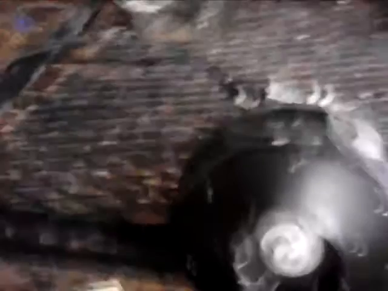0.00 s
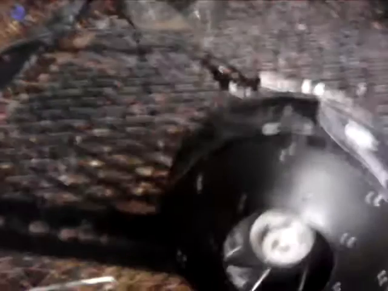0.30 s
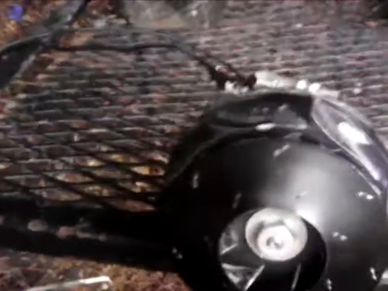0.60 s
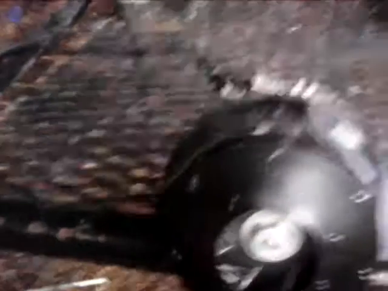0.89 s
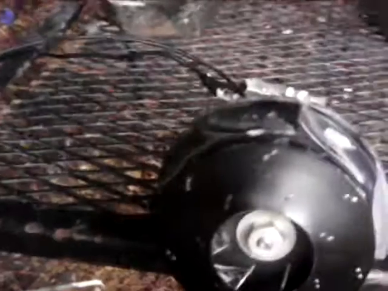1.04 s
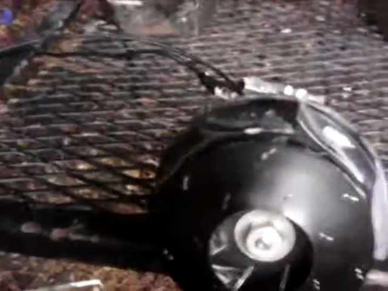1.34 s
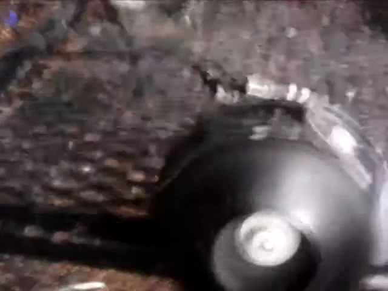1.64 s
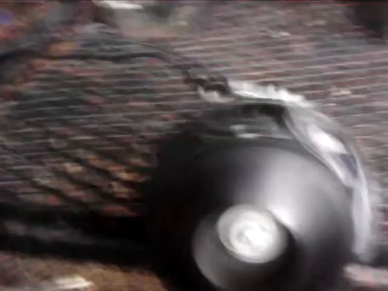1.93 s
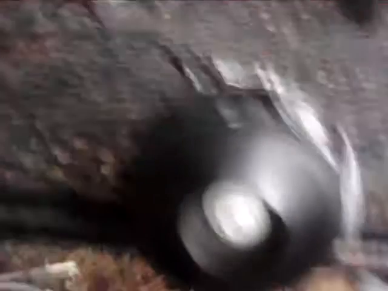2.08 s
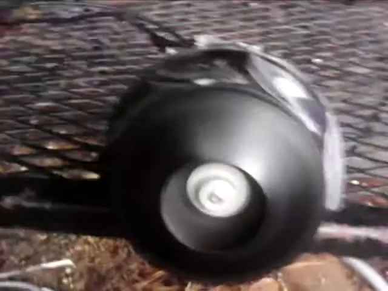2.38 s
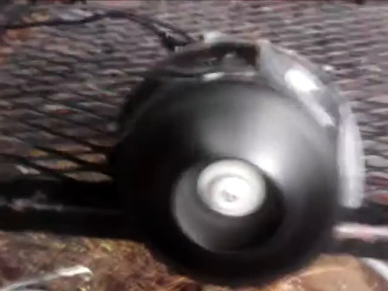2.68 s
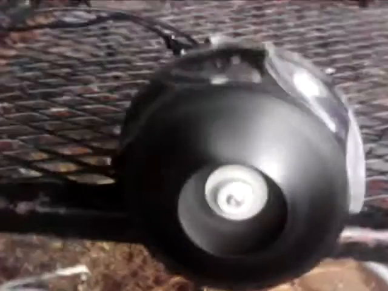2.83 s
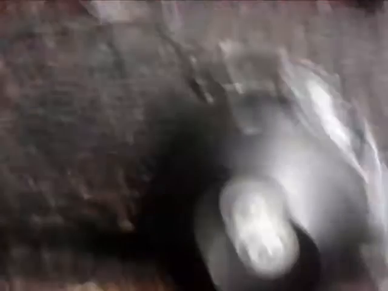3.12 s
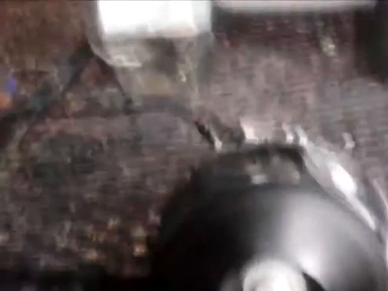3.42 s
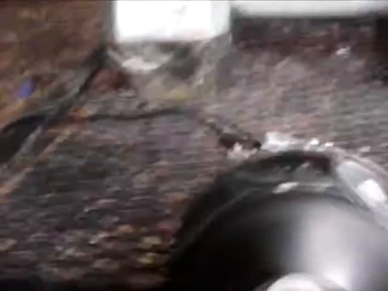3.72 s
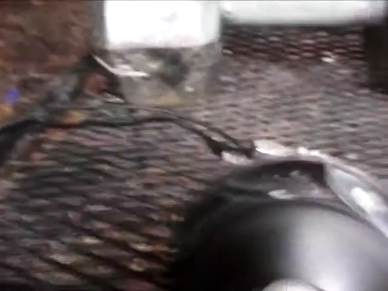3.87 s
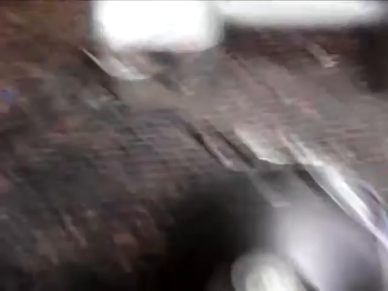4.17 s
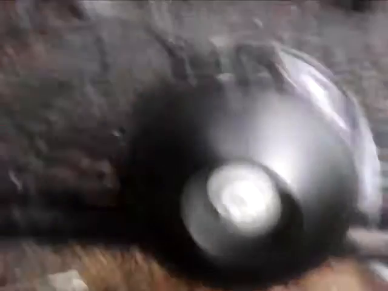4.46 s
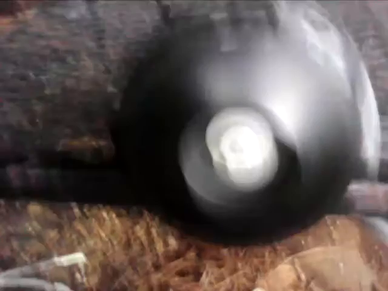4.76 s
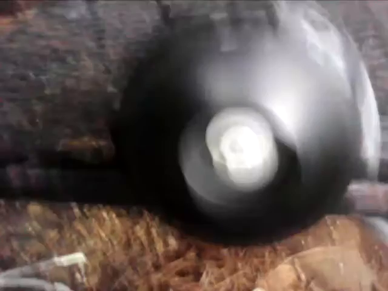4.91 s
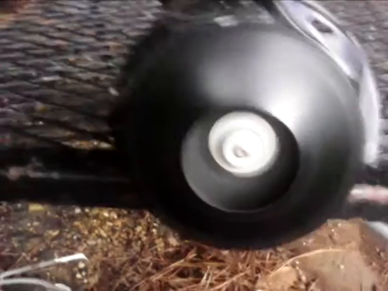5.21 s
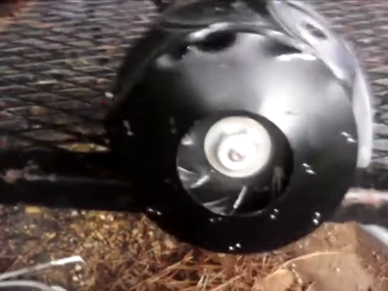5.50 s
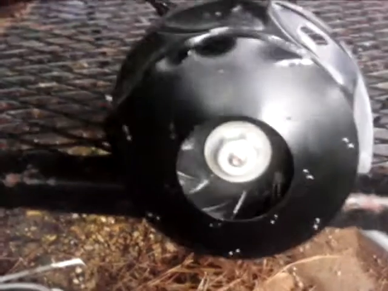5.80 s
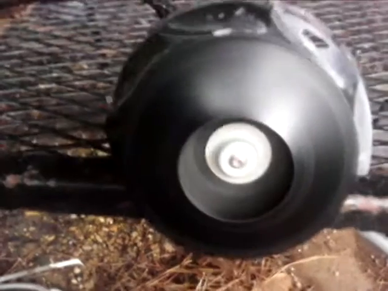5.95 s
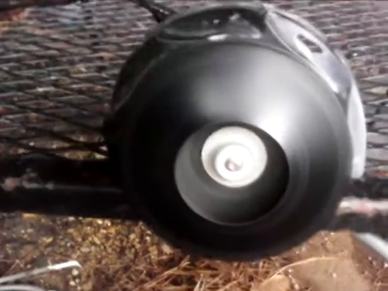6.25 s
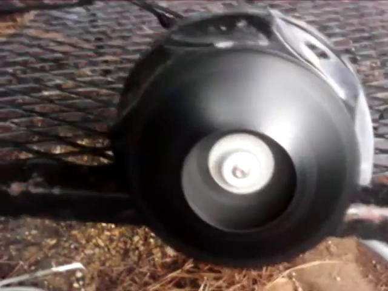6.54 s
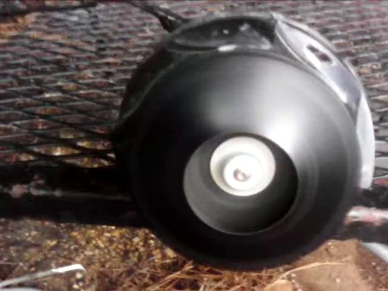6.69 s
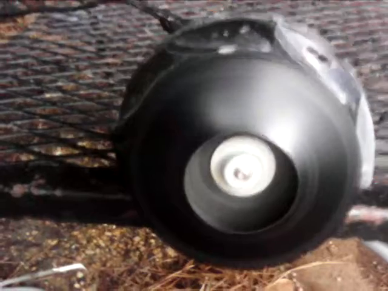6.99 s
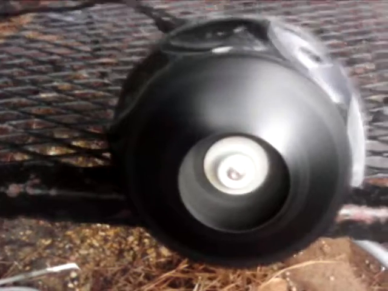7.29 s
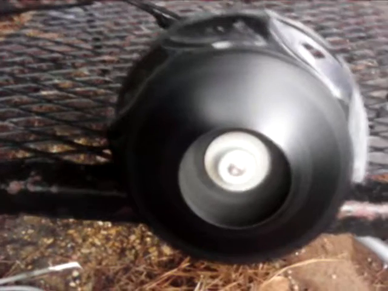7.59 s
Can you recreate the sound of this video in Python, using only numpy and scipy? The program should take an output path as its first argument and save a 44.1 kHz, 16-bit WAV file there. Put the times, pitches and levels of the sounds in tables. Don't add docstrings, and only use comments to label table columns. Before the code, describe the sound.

Quiet room hush and tiny taps on the microphone case give way to an exposed fan motor. Two short power bursts make it whine and hiss, followed by a falling glide. Another harder start rings its shell, then brush friction fizzes as it slows. A hand shifts faintly; four longer spin-ups follow in quick succession, loud and bright to the end. Very close handheld mono sound, little room echo.

```python
import sys
import numpy as np
from scipy import signal
from scipy.fft import rfft, irfft, next_fast_len
from scipy.io import wavfile
from scipy.ndimage import uniform_filter1d

SR = 44100
rng = np.random.default_rng(int(sys.argv[2]) if len(sys.argv) > 2 else 0)


def gain_from_db(level_db):
    decades = np.asarray(level_db, float) / 20
    return 10 ** decades


def store_wav(level_fs):
    pcm = np.round(np.clip(np.atleast_2d(level_fs), -1, 1) * 32767)
    wavfile.write(sys.argv[1], SR, pcm.T.astype(np.int16))


N = 336042
TIME_S = np.arange(N) / SR


def rms_one(x):
    return x / np.sqrt(np.mean(x ** 2) + 1e-20)


def drift(rate_hz):
    r = np.exp(-80 * np.pi * rate_hz / SR)
    slow = signal.lfilter([1], [1, -2 * r, r * r], rng.standard_normal(N // 40 + 2002))[2000:]
    return np.interp(np.arange(N) / 40, np.arange(len(slow)), rms_one(slow))


def coloured(points, modes=()):
    size = next_fast_len(N)
    hz = np.arange(size // 2 + 1) * SR / size + 1e-3
    points_hz, points_db = np.transpose(points)
    level_db = np.interp(np.log(hz), np.log(points_hz), points_db)
    for mode_hz, width_hz, mode_db in modes:
        level_db = level_db + mode_db / (1 + (2 * (hz - mode_hz) / width_hz) ** 2)
    gain = gain_from_db(level_db) * (hz > 10)
    counted = (hz > 2500) & (hz < 12000) if modes else hz > 0
    gain /= np.sqrt(np.mean(gain ** 2 * counted))
    return irfft(gain * rfft(rng.standard_normal(size)), size)[:N]


def resonance(x, hz, width_hz):
    r = np.exp(-np.pi * width_hz / SR)
    b = np.array([1, 0, -1]) * (1 - r * r) / 2
    return signal.lfilter(b, [1, -2 * r * np.cos(2 * np.pi * hz / SR), r * r], x + 1e-18)


def speed_up(speed_hz, smooth):
    return uniform_filter1d(np.gradient(speed_hz) * SR, size=smooth)


# (closes [s], opens [s])
SWITCH_S = [
    (1.018, 1.118),
    (1.368, 1.46),
    (3.054, 3.196),
    (5.302, 6.015),
    (6.213, 6.46),
    (6.772, 7.003),
    (7.267, 8.0),
]
STALL_HZ_PER_S, PULL_HZ_PER_S, PULL_KNEE_HZ = 2800, 29800, 99.8
FRICTION_HZ_PER_S, CREEP_HZ, FAN_DRAG_PER_HZ = 151.1, 40, .00243


def rotor():
    t = np.arange(N * 1000 // SR + 2) / 1000
    live = 0
    for on_s, off_s in SWITCH_S:
        live = live + np.clip(1000 * (t - on_s), 0, 1) - np.clip(1000 * (t - off_s), 0, 1)
    speed = [1.]
    for current in live[1:]:
        hz = speed[-1]
        pull = current * min(STALL_HZ_PER_S, PULL_HZ_PER_S / (1 + hz / PULL_KNEE_HZ) ** 2)
        brake = FRICTION_HZ_PER_S * np.tanh(hz / CREEP_HZ) + FAN_DRAG_PER_HZ * hz * hz
        speed.append(hz + (pull - brake) / 1000)
    return np.interp(TIME_S, t, speed), np.interp(TIME_S, t, live)


# (multiple of shaft speed, level [dB])
OVERTONES = [(1, 0), (2, -5), (3, -6.5), (5, -16)]
# (frequency [Hz], level over the hiss [dB])
BODY = [(60, -9), (120, -10), (170, -16), (215, -9.5), (260, -9), (330, -7.5), (400, -8.5), (500, -9),
        (680, -6.5), (800, -6.5), (1000, -12.5), (1500, -12)]
RATTLE_DB_PER_OCTAVE, RATTLE_HZ = 10, 360


def unbalance(angle, speed_hz, air_db):
    weak_db = RATTLE_DB_PER_OCTAVE * np.minimum(np.log2(speed_hz / RATTLE_HZ), 0)
    shaft = 0
    for k, level_db in OVERTONES:
        tone_db = level_db + np.interp(k * speed_hz, *np.transpose(BODY)) + (k > 1) * weak_db
        level = gain_from_db(tone_db + 1.5 * np.sqrt(k) * drift(8))
        shaft = shaft + level * np.sin(k * angle + rng.uniform(0, 6))
    return np.sqrt(2) * gain_from_db(air_db) * shaft


BLADES, BLADE_DB, BLADE_SIDE_DB = 7, -10.5, -5
INLET_HZ, INLET_WIDTH_HZ = 2000, 650


def blade_passing(angle, air_db):
    tone = gain_from_db(2.5 * drift(7)) * np.sin(BLADES * angle + .3 * drift(25))
    tone += gain_from_db(BLADE_SIDE_DB + 3 * drift(7)) * np.sin((BLADES + 1) * angle + .3 * drift(25))
    for _ in range(2):
        tone = resonance(tone, INLET_HZ, INLET_WIDTH_HZ)
    return np.sqrt(2) * gain_from_db(air_db + BLADE_DB) * tone


# (frequency [Hz], level over the hiss [dB])
SLOT_COLOUR = [(1400, -25), (1600, -12), (2200, -13), (2700, -12), (3300, -12.5), (3700, -19), (4600, -18),
               (6500, -15.5)]
# (frequency [Hz], width [Hz], level [dB])
LOAD_MODES = [(3200, 300, -2.5), (4180, 240, -1)]
SLOTS, SLOT_LOAD_DB, MAINS_HZ, HUM_DB = 13, -3, 120, -28


def slots(angle, speed_hz, air_db):
    mains = np.sin(2 * np.pi * MAINS_HZ * TIME_S)
    load = np.sqrt(np.clip(speed_up(speed_hz, 441) / 3000, 0, 1))
    pull = np.sin(SLOTS * angle + .3 * drift(30) + 2.2 * load * drift(110))
    colour_db = np.interp(SLOTS * speed_hz, *np.transpose(SLOT_COLOUR))
    line = pull * gain_from_db(colour_db + SLOT_LOAD_DB * load + 1.2 * drift(12)) * (1 + .8 * load * mains)
    for mode_hz, width_hz, mode_db in LOAD_MODES:
        line += gain_from_db(mode_db) * resonance(pull * load, mode_hz, width_hz)
    return np.sqrt(2) * gain_from_db(air_db) * (line + gain_from_db(HUM_DB) * load * mains)


# (shell rings [s], ring over the hiss [dB], jolt strikes [s], jolt [dB])
STARTS = [
    (1.071, 26.5, 1.036, -59),
    (3.109, 31.5, 3.084, -46),
    (5.359, 27, 5.32, -57),
]
SHELL_HZ, SHELL_WIDTH_HZ = 1990, 24


def shell_ring(angle, speed_hz, air_db):
    torque = np.clip(speed_up(speed_hz, 441) / 3000, 0, 1)
    rings_s, rings_db, *_ = np.transpose(STARTS)
    kick = gain_from_db(air_db + np.interp(TIME_S, rings_s, rings_db)) * torque * np.sin(SLOTS * angle)
    for _, _, switch_s, jolt_db in STARTS:
        kick[round(switch_s * SR)] += gain_from_db(jolt_db) * SR / (2 * np.pi * SHELL_WIDTH_HZ)
    return np.sqrt(2) * resonance(kick, SHELL_HZ, SHELL_WIDTH_HZ)


GATE_SHUT_HZ, GATE_OPEN_HZ, GATE_DB, GATE_LAG_S = 47.6, 81.5, -19.5, 0.011


def gate(speed_hz):
    late_hz = np.interp(np.arange(N) - GATE_LAG_S * SR, np.arange(N), speed_hz)
    return np.clip(np.log(late_hz / GATE_SHUT_HZ) / np.log(GATE_OPEN_HZ / GATE_SHUT_HZ), 0, 1)


AIR_DB_AT_200_HZ, AIR_DB_PER_OCTAVE, CEILING_DB, LOAD_DB = -22, 17, -14, 2
REOPEN_S, REOPEN_WIDTH_S, REOPEN_DB = 4.54, .07, 9


def air_level(speed_hz):
    load = np.clip(speed_up(speed_hz, 881) / STALL_HZ_PER_S, 0, 1)
    free_db = AIR_DB_AT_200_HZ + AIR_DB_PER_OCTAVE * np.log2(speed_hz / 200)
    free = gain_from_db(free_db + LOAD_DB * load + GATE_DB * (1 - gate(speed_hz)))
    limited = free / (1 + (free / gain_from_db(CEILING_DB)) ** 6.0) ** (1 / 6)
    return 20 * np.log10(limited) + REOPEN_DB * np.exp(-((TIME_S - REOPEN_S) / REOPEN_WIDTH_S) ** 2)


# (frequency [Hz], density [dB per Hz])
FAST_AIR = [(60, -30), (150, -27.5), (300, -20), (550, -18), (800, -15), (1400, -16), (2000, -18),
            (3600, -14.5), (5700, -14), (8500, -15.5), (11400, -17), (12500, -23), (14000, -22.5)]
SLOW_AIR = [(60, -12), (120, -5.5), (270, -12), (550, -8.5), (900, -5.5), (1400, -10.5), (2400, -19.5),
            (3600, -11.5), (5700, -10), (7600, -17), (11400, -26.5), (14000, -53)]
SLOW_HZ, FAST_HZ = 107.05, 314
# (frequency [Hz], width [Hz], level [dB])
HOUSING = [(1693, 65, 4), (2566, 1130, 8), (4487, 940, 4), (7130, 1000, 6.5), (10240, 400, -2.5),
           (13590, 700, 13.5)]
# (frequency [Hz], width [Hz], level [dB])
NOTCHES = [(3150, 300, -8), (12850, 650, -11)]
# (frequency [Hz], width [Hz], level [dB])
TURNED = [(2240, 260, 5), (5070, 400, -5.5), (6340, 1500, 2), (10040, 760, -3)]
TURNED_FROM_S, TURNED_TO_S = 3.07, 4.9


def air(speed_hz, air_db):
    bright = np.clip(np.log(speed_hz / SLOW_HZ) / np.log(FAST_HZ / SLOW_HZ), 0, 1)

    def hiss(modes):
        return np.sqrt(bright) * coloured(FAST_AIR, modes) + np.sqrt(1 - bright) * coloured(SLOW_AIR, modes)

    heard = hiss(HOUSING + NOTCHES)
    aside = slice(round(TURNED_FROM_S * SR), round(TURNED_TO_S * SR))
    heard[aside] = hiss(HOUSING + NOTCHES + TURNED)[aside]
    return gain_from_db(air_db + 0.1 * drift(11) + 0.9 * drift(67)) * heard


DRAG_DB, DRAG_DB_PER_OCTAVE, DRAG_HZ = -54, 8, 163
GRID_HZ, GRID_DB, FACING_DB = 5130, 21.5, 5


def brushes(speed_hz, live):
    facing = TIME_S > TURNED_FROM_S
    octaves = np.log2(speed_hz / 100)
    grid = facing * gain_from_db(GRID_DB + 7.8 * octaves) * resonance(rng.standard_normal(N), GRID_HZ, 200)
    friction = rms_one(resonance(rng.standard_normal(N), .98 * SHELL_HZ, 53))
    coasting = np.clip(5.4 * (1 - speed_hz / DRAG_HZ), 0, 1) * uniform_filter1d(1 - live, size=441)
    level_db = DRAG_DB + DRAG_DB_PER_OCTAVE * octaves + 0.55 * GATE_DB * (1 - gate(speed_hz))
    return coasting * gain_from_db(level_db + FACING_DB * facing + 1.5 * drift(22)) * (friction + grid)


# (time [s], length [s], level [dB], release [dB per s])
BLOWS = [(1.035, 0.93, -38, 161), (1.93, 0.2, -31.5, 60), (2.2, 0.4, -40.5, 230), (3.06, 0.98, -42, 146),
         (3.793, 0.45, -31.5, 101), (4.47, .05, -46, 28), (5.3, .25, -40, 60), (5.55, 1.1, -45, 150),
         (6.65, 0.65, -36, 100), (7.3, 0.19, -42, 90)]
# (frequency [Hz], density [dB per Hz])
GUST_COLOUR = [(12, -25), (22, 2), (36, 1), (70, -2.5), (130, -9), (300, -57.5)]
BLOW_ATTACK_S, STILL_DB, LUMP_DB = .05, -61.5, 2.0


def gusts():
    level = gain_from_db(STILL_DB)
    for start_s, length_s, level_db, release_db_per_s in BLOWS:
        swell = np.clip((TIME_S - start_s) / BLOW_ATTACK_S, 0, 1) ** 2
        release_db = release_db_per_s * np.maximum(TIME_S - start_s - length_s, 0)
        level = np.maximum(level, swell * gain_from_db(level_db - release_db))
    return level * gain_from_db(-6.0 + LUMP_DB * drift(3.6) + 2.8 * drift(22)) * coloured(GUST_COLOUR)


# (time [s], peak [dB], rub length [s])
TAPS = [(0.03, -67, 0.018), (0.172, -53, 0.0087), (0.408, -64, 0.016), (0.529, -73, 0.016),
        (0.581, -67, 0.016), (0.708, -60, 0.021), (0.732, -59, 0.016), (0.834, -62, 0.019),
        (0.854, -62, 0.016)]
# (frequency [Hz], level [dB], t60 [s])
CASE = [(870, 8, 0.028), (1050, -1, 0.056), (1850, -14, .03)]


def taps():
    rubs, grit = np.zeros(N), rng.standard_normal(N)
    for time_s, peak_db, length_s in TAPS:
        size = max(round(length_s * SR), 40)
        start = round(time_s * SR) - size // 4
        rubs[start:][:size] += gain_from_db(peak_db + 5.5) * np.hanning(size) / np.sqrt(size)
    out = np.zeros(N)
    for hz, level_db, t60_s in CASE:
        r, w = gain_from_db(-60 / (t60_s * SR)), 2 * np.pi * hz / SR
        rub = resonance(rubs * grit, hz, 500)
        out += gain_from_db(level_db) * signal.lfilter([0, np.sin(w)], [1, -2 * r * np.cos(w), r * r], rub)
    return out


# (time [s], swell [s], level [dB])
HANDS = [
    (.6, .4, -66.5),
    (4.47, .03, -65.5),
]
# (frequency [Hz], density [dB per Hz])
MURMUR_COLOUR = [(60, -18.5), (110, 4), (220, -6.5), (520, -11.5), (900, -19.5), (1300, -19), (1600, -30),
                 (2600, -38.5)]
# (frequency [Hz], density [dB per Hz])
ELECTRONICS_COLOUR = [(500, -28), (1000, 1), (1500, 0), (3400, -12), (8000, -16), (13000, -7.5),
                      (14000, -8)]
ELECTRONICS_DB, MURMUR_DB, WAKE_DB, SETTLE_DB_PER_S = -79.5, -70.5, -43, 48
WARM_UP_S, WARM_UP_DB = .3, -3


def floor(speed_hz, live):
    wake = gain_from_db(WAKE_DB + 1.8 * GATE_DB * (1 - gate(speed_hz))) * np.clip(speed_hz / GATE_SHUT_HZ, 0, 1) ** 2.0
    wake *= np.clip(2 - speed_hz / 110, 0, 1) * uniform_filter1d(1 - live, size=441)
    hand = 0
    for start_s, swell_s, level_db in HANDS:
        settle_db = SETTLE_DB_PER_S * np.maximum(TIME_S - start_s - swell_s, 0)
        hand = hand + np.clip((TIME_S - start_s) / swell_s, 0, 1) * gain_from_db(level_db - settle_db)
    room = gain_from_db(MURMUR_DB + WARM_UP_DB * np.clip(1 - TIME_S / WARM_UP_S, 0, 1))
    murmur = (room + wake + hand) * gain_from_db(2.0 * drift(8)) * coloured(MURMUR_COLOUR)
    return murmur + gain_from_db(ELECTRONICS_DB) * coloured(ELECTRONICS_COLOUR)


DUCK_S, DUCK_WIDTH_S, DUCK_DB = 4.445, 0.013, -8


def scene():
    speed_hz, live = rotor()
    angle = 2 * np.pi * np.cumsum(speed_hz) / SR
    air_db = air_level(speed_hz)
    mono = unbalance(angle, speed_hz, air_db) + blade_passing(angle, air_db)
    mono += slots(angle, speed_hz, air_db) + shell_ring(angle, speed_hz, air_db)
    mono += air(speed_hz, air_db) + brushes(speed_hz, live)
    mono += gusts() + taps() + floor(speed_hz, live)
    mono *= gain_from_db(DUCK_DB * np.exp(-((TIME_S - DUCK_S) / DUCK_WIDTH_S) ** 2))
    return np.stack([mono, mono])


# (frequency [Hz], width [Hz], threshold of the drift [spreads])
DROPPED_BANDS = [(3110, 190, .5), (3290, 150, .9), (10000, 260, 1.4), (12250, 300, .9), (12600, 400, .2),
                 (12950, 380, -.2)]


def drop_bands(x):
    size = next_fast_len(N)
    hz, spectrum = np.arange(size // 2 + 1) * SR / size, rfft(x, size)
    loud = 1. * (uniform_filter1d(x[0] ** 2, size=500) > gain_from_db(-62))
    lost = 0
    for centre_hz, width_hz, threshold in DROPPED_BANDS:
        band = irfft(spectrum * np.exp(-(2 * (hz - centre_hz) / width_hz) ** 6), size)[..., :N]
        lost = lost + band * uniform_filter1d(loud * (drift(11) > threshold), size=600)
    return x - lost


def top_cut(x):
    return signal.sosfilt(signal.butter(12, 14170, fs=SR, output="sos"), x)


CUTOFF_HZ = 14120


def record(dry):
    rounded = .9 * np.tanh(dry / .9)
    cut = signal.sosfilt(signal.cheby2(14, 60, CUTOFF_HZ, fs=SR, output="sos"), rounded)
    return top_cut(drop_bands(cut))


dry = scene()
out = record(dry)
store_wav(out)
```